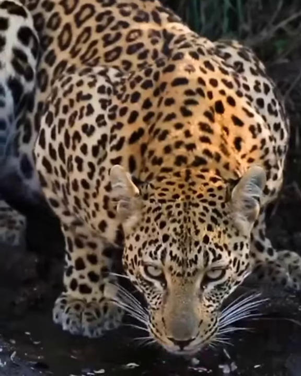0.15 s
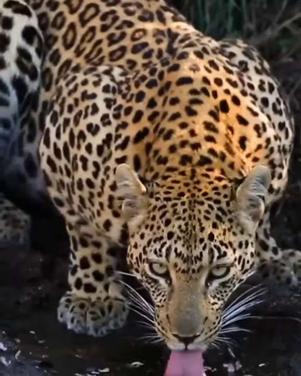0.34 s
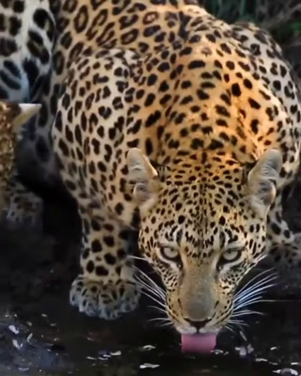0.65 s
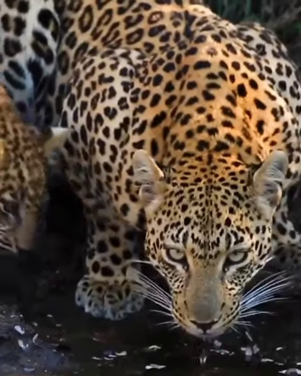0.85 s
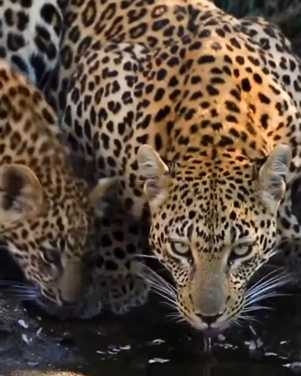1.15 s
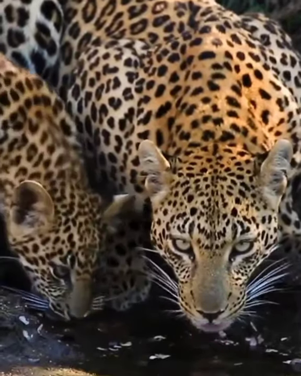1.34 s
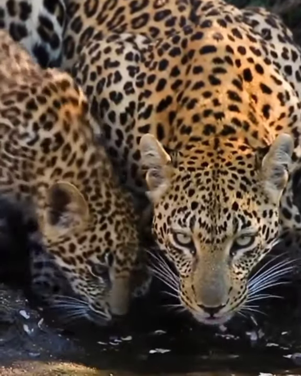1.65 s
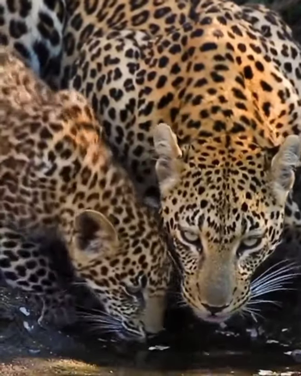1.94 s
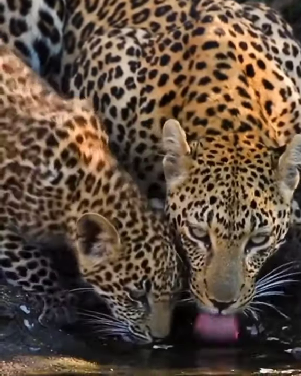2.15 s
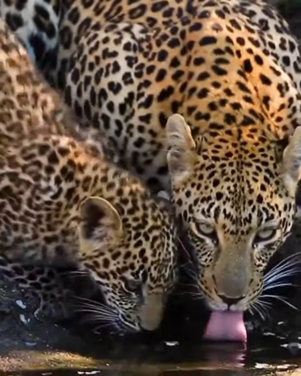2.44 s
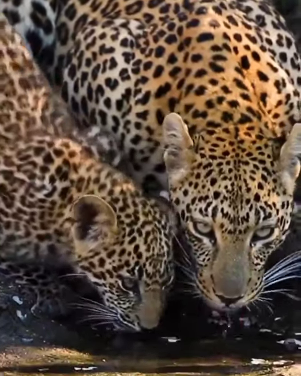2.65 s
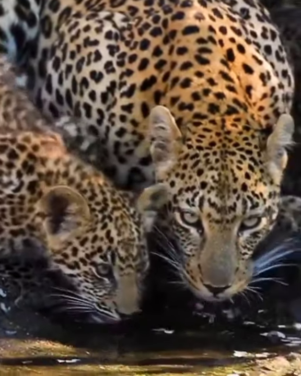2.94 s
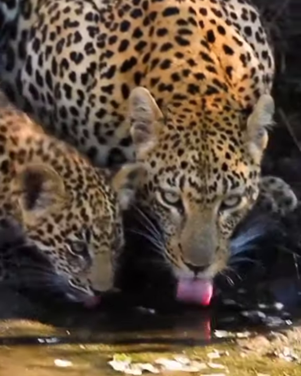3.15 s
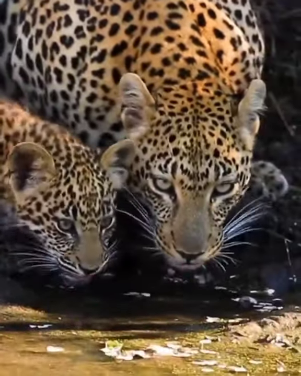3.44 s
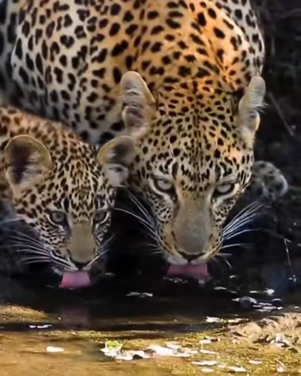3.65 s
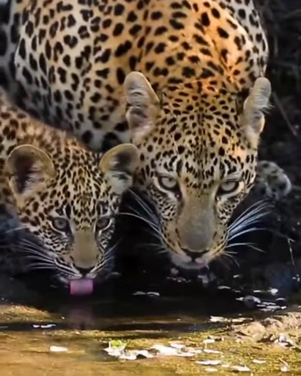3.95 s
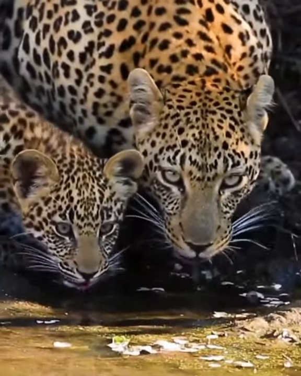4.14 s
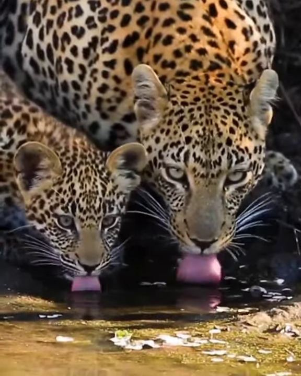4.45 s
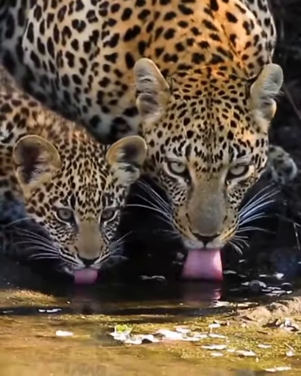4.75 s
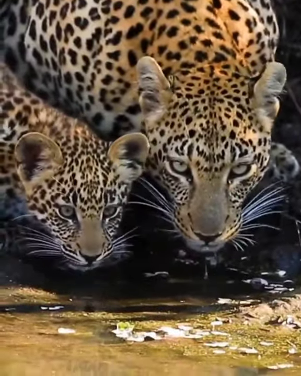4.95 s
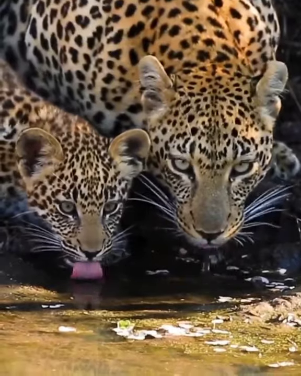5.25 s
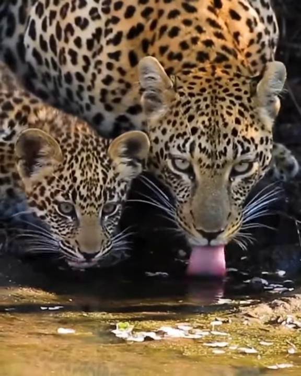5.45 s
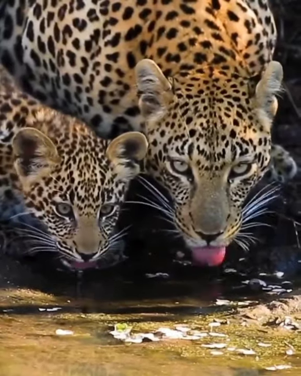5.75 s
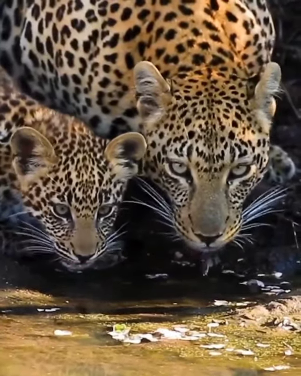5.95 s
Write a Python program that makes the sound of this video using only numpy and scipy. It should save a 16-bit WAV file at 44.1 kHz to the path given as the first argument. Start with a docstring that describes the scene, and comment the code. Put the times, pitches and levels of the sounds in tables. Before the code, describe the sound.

After a tenth of a second of silence, a faint, steady outdoor hiss begins, gently fluctuating, with tiny droplets beneath it. Two leopards lap at a pool: soft bubbly plops at 0.2 to 0.35 s, then a sharp, bright wet tick at 0.66. At 0.85 a camera very close to the microphone fires, a rapid cluster of metallic clacks and rattles in a hollow housing, lasting under a quarter second with low thuds. Sparse ticks follow from 1.35; plops return around 2.1, with a stronger one at 2.5. Lapping thickens from 2.85, and wet clicks crowd together from 3.7 to 4.2, with a firm plop at 3.9. The shutter clatters again at 4.66, followed by a tiny double knock at 4.85. Dull handling bumps land at 5.12 and 5.18, stronger than a faint one at 3.03. Small plops continue over the hiss until about 6 s.

```python
"""At the edge of an outdoor pool: a faint hiss of air lies behind two big cats lapping at the water.
Tongue plops are ringing bubbles with a slap of noise; wet ticks are short pitched cracks; droplets ring faintly.
Close to the microphone a camera fires twice: its contacts drive rattling parts, metal and a hollow housing.
A short double knock, made like the plops, is probably the camera settling; the hand-held gear is knocked too.
The two microphone ports agree in the bass and differ in the treble."""
import sys
import numpy as np
from scipy import signal
from scipy.fft import rfft, irfft
from scipy.io import wavfile

SR = 44100
rng = np.random.default_rng(int(sys.argv[2]) if len(sys.argv) > 2 else 0)


def pcm_store(signal):
    """Save signal as 16-bit PCM."""
    levels = np.round(np.clip(np.atleast_2d(signal), -1, 1) * 32767)
    wavfile.write(sys.argv[1], SR, levels.astype(np.int16).T)


N = 269010


def amp(db):
    """dB to gain."""
    return 10 ** (np.asarray(db) / 20)


def rms_one(x):
    """Scale to unit rms."""
    return x / np.sqrt(np.mean(x ** 2) + 1e-20)


def shaped(x, spectrum):
    """Colour a noise by a (frequency [Hz], level [dB]) spectrum, interpolated over log frequency."""
    hz = np.maximum(np.fft.rfftfreq(x.shape[-1], 1 / SR), 1)
    point_hz, point_db = np.array(spectrum).T
    gain = amp(np.interp(np.log(hz), np.log(point_hz), point_db))
    return irfft(rfft(x) * gain, x.shape[-1])


def butter(x, hz, kind, order=2):
    """Causal Butterworth filter."""
    return signal.sosfilt(signal.butter(order, hz, kind, fs=SR, output="sos"), x)


def drift(rate_hz):
    """Random wander below rate_hz, with unit rms; the filter settles for a second first."""
    return rms_one(butter(rng.standard_normal(N + SR), rate_hz, "low")[SR:])


def ring(drive, hz, t60):
    """A unit click sets a tone of height 1 ringing; nothing radiates far below its pitch."""
    radius = amp(-60 / (t60 * SR))
    angle = 2 * np.pi * hz / SR
    # the tiny offset keeps the decay out of very slow arithmetic
    return signal.lfilter([.5, 0, -.5], [1, -2 * radius * np.cos(angle), radius ** 2], drive + 1e-18)


def add(track, s, sound):
    """Mix a short sound in at time s."""
    at = round(s * SR)
    track[..., at:at + sound.shape[-1]] += sound[..., :N - at]


def burst(t60, rise_s):
    """Envelope that rises fast and dies away over t60, at most 150 ms long."""
    t = np.arange(round(.15 * SR)) / SR
    return (1 - np.exp(-t / rise_s)) * amp(-60 * t / np.clip(t60, .003, .3))


# Spectrum of the outdoor hiss, relative: (frequency [Hz], level [dB per Hz])
AIR_SPECTRUM = [(12, -45), (20, -24.5), (82, -9.5), (561, -2.5), (865, -6.5), (1130, -6), (2170, -10),
                (3350, -9.5), (7160, -12), (13000, -13.5)]
# Course of the hiss before gusts and flicker: (time [s], level below 3.5 kHz [dB], level above it [dB])
AIR_LEVEL = [(.4, -57, -61), (.75, -58.5, -61.5), (1.6, -59.5, -64.5), (2.3, -58.5, -63),
             (2.83, -59.5, -64.5), (3.15, -57.5, -62), (3.7, -59, -62.5), (4.1, -57.5, -61.5),
             (4.73, -58, -62.5), (6.1, -59, -63.5)]
GUST_DB = .6   # rms


def air():
    """Outdoor hiss; a shared gust swells all of it, and the low band and each treble band flicker apart."""
    s, low_db, high_db = np.transpose(AIR_LEVEL)
    t = np.arange(N) / SR
    hiss = shaped(rng.standard_normal((3, 2, N)), AIR_SPECTRUM)
    gust = GUST_DB * drift(5.9)
    edges = np.geomspace(3500, 14000, 5)
    low = rms_one(butter(hiss[-1], edges[0], "low", order=3)) * amp(0.93 * drift(25))
    # neighbouring bands get unrelated noise
    bands = [butter(hiss[k % 2], edges[k:k + 2], "band", order=3) for k in range(len(edges) - 1)]
    high = rms_one(sum(band * amp(2.0 * drift(19.4)) for band in bands))
    low_gain = amp(np.interp(t, s, low_db) + gust)
    high_gain = amp(np.interp(t, s, high_db) + gust)
    return low * low_gain + high * high_gain


SPLASHES_PER_S, SMALLEST_SPLASH_DB = 110, -67.5


def splashes():
    """Faint droplets at random, each ringing at one of 14 pitches and gone by about 16 cycles."""
    falls = rng.random(N) < SPLASHES_PER_S / SR
    sizes = amp(4.55 * np.minimum(rng.exponential(1, N), 4)) * falls
    dealt = rng.integers(0, 14, N)
    pitches = np.geomspace(450, 5000, 14)
    return amp(SMALLEST_SPLASH_DB) * sum(ring(sizes * (dealt == k), hz, 15.7 / hz)
                                         for k, hz in enumerate(pitches))


# Tongue plops, and at 4.848 s a short double knock, probably the camera settling:
# (time [s], ringing level [dB], pitch [Hz], t60 [s])
PLOPS_AND_SETTLING = [(.219, -46, 1040, 0.024), (.252, -41, 495, 0.032), (.352, -51, 616, 0.046),
                      (2.086, -50, 750, .035), (2.105, -45, 1116, 0.032), (2.356, -46.5, 1290, 0.03),
                      (2.4862, -30, 980, 0.0083), (2.492, -44, 1400, .017), (2.846, -45.5, 227, 0.032),
                      (2.856, -49.5, 2700, .04), (2.919, -45, 1253, 0.043), (2.968, -51.5, 376, 0.057),
                      (3.007, -42, 594, 0.014), (3.111, -51, 1990, .025), (3.139, -47, 1200, 0.05),
                      (3.184, -45, 1400, 0.025), (3.272, -48, 1186, 0.033), (3.361, -46, 1460, .03),
                      (3.512, -55, 750, 0.056), (3.614, -45.5, 480, 0.026), (3.639, -44, 1250, .03),
                      (3.8986, -32.5, 434, .012), (4.034, -48.5, 1080, 0.069), (4.343, -46, 2530, 0.016),
                      (4.4787, -37, 1790, 0.03), (4.8478, -43, 2070, 0.026), (4.8488, -44, 700, 0.014),
                      (5.068, -50, 956, 0.031), (5.222, -48, 796, .043), (5.455, -51, 1170, .03),
                      (5.49, -48, 1460, 0.041), (5.607, -49, 953, 0.073), (5.73, -41.5, 1210, 0.021),
                      (5.8127, -47.5, 3830, .023), (5.88, -51, 1250, .04)]
SLAP_DB, SLAP_T60_S = -7, 0.019   # level relative to the ringing
WOBBLE_RAD = 0.46   # rms phase waver of the ringing


def plops_and_settling():
    """A decaying tone with a wider noise slap: a plop's bubble and wet slap, or the settling double knock."""
    out = np.zeros(N)
    for s, db, hz, t60 in PLOPS_AND_SETTLING:
        envelope = burst(t60, rise_s=0.00032)
        t = np.arange(len(envelope)) / SR
        slap_noise = rms_one(butter(rng.standard_normal(len(t)), [hz / 1.6, hz * 1.87], "band"))
        slap = slap_noise * burst(SLAP_T60_S, rise_s=0.00013)
        waver = WOBBLE_RAD * rms_one(butter(rng.standard_normal(len(t)), 120, "low"))
        ringing = envelope * np.sin(2 * np.pi * hz * t + waver)
        add(out, s, amp(db) * butter(amp(SLAP_DB) * slap - ringing, hz / 7, "high"))
    return out


# Bright wet ticks: (time [s], level [dB], pitch [Hz])
TICKS = [(.3848, -50, 7950), (.633, -48, 4880), (0.6567, -21, 6000), (1.3555, -38, 5630),
         (1.558, -47, 5430), (1.567, -46, 5490), (1.956, -52, 8500), (2.1061, -43.5, 3930),
         (3.0136, -43.5, 10700), (3.6163, -46, 3870), (3.715, -47, 7800), (3.7657, -45, 6010),
         (3.7882, -42.5, 8800), (3.791, -52, 8890), (3.8222, -46, 7780), (3.857, -40.5, 6600),
         (3.8937, -40, 6000), (3.8995, -35.5, 5400), (3.9507, -45.5, 5840), (3.9725, -50, 7000),
         (3.986, -48.5, 8500), (3.991, -43, 5500), (4.0312, -34.5, 5600), (4.041, -53, 6500),
         (4.111, -46, 6490), (4.1198, -43, 6100), (4.195, -51, 7000), (4.607, -49, 3850),
         (5.181, -43, 3660), (5.456, -53, 3800)]
BODY_T60_S, TAIL_T60_S = 0.022 * 0.38, 0.022 * 2.3   # for a tick at -42.5 dB
TICK_SHORTENS = 0.15   # dB of length lost per dB of level
TICK_EDGE = 3.2   # first impulse relative to the noise


def ticks():
    """A sharp crack around its own pitch, the harder the shorter, with a weaker tail."""
    out = np.zeros((2, N))
    for s, db, hz in TICKS:
        stretch = amp(-TICK_SHORTENS * (db + 42.5))
        body = burst(BODY_T60_S * stretch, rise_s=0.00014)
        envelope = body + 0.17 * burst(TAIL_T60_S * stretch, rise_s=0.00027)
        snap = rng.standard_normal((2, len(envelope)))
        tone = rms_one(butter(snap, [hz / 1.12, min(hz * 1.28, 16000)], "band"))
        fizz = 0.77 * butter(snap, 5300, "high", order=4)
        click = signal.unit_impulse(len(envelope))
        edge = butter(click, [hz / 1.1, min(hz * 1.55, 18000)], "band")
        add(out, s, amp(db) * (envelope * (tone + fizz) + TICK_EDGE * edge))
    return out


# Dull knocks on the hand-held gear: (time [s], blow level [dB])
KNOCKS = [(3.03, -52), (5.124, -42.5), (5.1803, -40)]
# Modes of the gear: (frequency [Hz], level [dB], t60 [s])
GEAR_MODES = [(275, -14, 0.03), (374, 5.5, 0.025), (700, -5, 0.019), (1115, -9, 0.03)]
# The heavy frame, answering late: (frequency [Hz], level [dB], t60 [s], delay [s])
GEAR_BOOM = (199, -1, 0.07, .007)


def knocks():
    """One blow strikes every mode of the gear; the heavy frame is pushed softly a moment later."""
    blows, late = np.zeros(N), np.zeros(N)
    boom_hz, boom_db, boom_t60, delay_s = GEAR_BOOM
    for s, db in KNOCKS:
        blows[round(s * SR)] = -amp(db)
        late[round((s + delay_s) * SR)] = amp(db + boom_db)
    boom = ring(butter(late, 290, "low"), boom_hz, boom_t60)
    soft_blows = butter(blows, 2400, "low")
    return boom + sum(amp(db) * ring(soft_blows, hz, t60) for hz, db, t60 in GEAR_MODES)


# The camera fires: (time [s], level [dB], level added to the winding-down contacts [dB])
RELEASES = [(0.8525, -0.5, 3.5), (4.6623, -0.17, -3.5)]
# Contacts of one firing, before its own level: latch, mirror at its stop, mirror bounces, blades start,
# two blade sets land, recocking, winding down.
# (time after release [s], rattle level [dB], heavy parts above it [dB], fine parts above it [dB],
#  housing drive [dB], rattle t60 [s])
CYCLE = [(0, -35, 2, -10, -85, 0.028), (.0115, -24.5, -8, -4, -65.5, .026), (.016, -37.5, -2, -9, -58, 0.1),
         (0.021, -38, -5.5, -4, -63, 0.095), (0.032, -39, 7, -4, -60, 0.046),
         (0.041, -44.5, -3, -2, -70, 0.025), (.058, -54, 0, 9, -53.5, .09), (.063, -21, -10, -2, -59, .024),
         (0.0713, -20.5, -24.5, 9, -53, 0.017), (0.0774, -29.5, 0.5, -6, -77, 0.056),
         (.083, -38, 6, 6, -85, 0.033), (.0883, -34.5, 4.5, 7.5, -66, .042),
         (0.09, -35, 5.5, -2, -73, 0.042), (0.096, -29, -2, 8, -53.5, .04),
         (0.1095, -39, 9, 3, -65.5, 0.03), (.120, -50, 15.5, -5, -60, 0.089),
         (0.13, -57, 1.5, 4, -73, 0.16)]
# Stray clatter of the same parts after the first firing: (time [s], then as in CYCLE)
CLATTER = [(1.023, -48, -4, 7, -60.5, 0.054), (1.0272, -38, 14.5, -5, -70, 0.015),
           (1.042, -53.5, 9, -1, -67.5, 0.079)]
WINDING_DOWN_S = .112   # after release


def contacts():
    """Every firing plays the same cycle of contacts at its own strength; stray clatter is added."""
    fired = []
    for start, level_db, winding_db in RELEASES:
        for s, db, heavy_db, fine_db, housing_db, t60 in CYCLE:
            gain_db = level_db + winding_db * (s > WINDING_DOWN_S)
            fired.append((start + s, db + gain_db, heavy_db, fine_db, housing_db + gain_db, t60))
    return fired + CLATTER


# Spectrum of the loose parts, relative: (frequency [Hz], level [dB per Hz])
RATTLE_SPECTRUM = [(760, -24), (1300, -4.5), (1740, -6.5), (2710, -3), (3310, -7.5), (3940, -5), (4700, 2),
                   (5600, 2.5), (6600, -6.5), (9620, -2.5), (13000, -15), (15500, -28)]
# Ringing metal parts: (frequency [Hz], level before METAL_DB [dB], t60 [s])
METAL_MODES = [(2608, -5, 0.04), (3460, -5, 0.05), (4900, -9, 0.02), (5400, -6, 0.02), (6040, 3, 0.025),
               (6590, 3, 0.02), (7400, -10, 0.03), (9500, -20, .03), (10300, -20.5, 0.04)]
METAL_DB = -31.5   # how strongly the rattle drives the metal parts
HEAVY_BELOW_HZ, FINE_ABOVE_HZ = 2920, 7050


def rattle_and_metal():
    """Each contact shakes loose parts of three sizes; their rattle sets metal of like pitch ringing."""
    rattle = np.zeros((3, 1, N))   # envelopes of the heavy, middle and fine parts
    for s, db, heavy_db, fine_db, _, t60 in contacts():
        levels = amp(db + np.array([heavy_db, 0, fine_db]))
        add(rattle, s, levels[:, None, None] * burst(t60, rise_s=0.00068))
    uneven = amp(1.2 * drift(640))   # the parts knock together in tiny clumps
    grit = rms_one(shaped(rng.standard_normal((2, N)), RATTLE_SPECTRUM)) * uneven
    sizes = [butter(grit, HEAVY_BELOW_HZ, "low", order=4),
             butter(grit, [HEAVY_BELOW_HZ, FINE_ABOVE_HZ], "band", order=3),
             butter(grit, FINE_ABOVE_HZ, "high", order=4)]
    shake = uneven * rng.standard_normal((2, N))
    size_of = np.searchsorted([HEAVY_BELOW_HZ, FINE_ABOVE_HZ], np.array(METAL_MODES)[:, 0])
    metal = sum(amp(db + METAL_DB) * ring(rattle[k] * shake, hz, t60)
                for k, (hz, db, t60) in zip(size_of, METAL_MODES))
    return (rattle * sizes).sum(axis=0) + metal


# Modes of the hollow housing: (frequency [Hz], level [dB], t60 [s])
HOUSING_MODES = [(348, -15, 0.015), (484, -12.5, 0.068), (573, -7.5, 0.022), (679, -6, 0.081),
                 (700, -4, 0.047), (755, -3, 0.05), (920, -1, 0.022), (1029, -7.5, 0.051),
                 (1140, -3.5, 0.032), (1400, -9.5, 0.0077)]


def housing():
    """Each contact pushes the hollow housing with a burst of noise, and its modes boom."""
    push = np.zeros(N)
    for s, _, _, _, housing_db, _ in contacts():
        add(push, s, amp(housing_db) * burst(0.053, rise_s=0.0017))
    return sum(amp(db) * ring(push * rng.standard_normal(N), hz, t60) for hz, db, t60 in HOUSING_MODES)


# The mirror lands in the camera: (time [s], blow level before the low-pass [dB])
THUDS = [(.968, -39.5), (1.025, -42), (1.045, -43), (4.74, -46.5)]
THUD_HZ, THUD_T60_S = 270, 0.065


def mirror_thuds():
    """Softened blows set one low mode of the camera ringing."""
    blows = np.zeros(N)
    for s, db in THUDS:
        blows[round(s * SR)] = amp(db)
    return ring(butter(blows, 630, "low"), THUD_HZ, THUD_T60_S)


def shutter():
    """The camera up close: rattle and ringing metal, booming housing and landing mirror."""
    return rattle_and_metal() + housing() + mirror_thuds()


PORTS_PART_HZ = 4820
NEAR_SIDE_DB, AIR_SIDE_DB = -17, -4.5   # treble difference between the ports
BASS_SIDE_DB = -49   # full-band difference, relative to the treble one


def ports(mid_side, side_db):
    """Left and right microphone ports: only the treble differs much between them."""
    mid, side = mid_side
    treble = butter(side, PORTS_PART_HZ, "high", order=14)
    side = amp(side_db) * (treble + amp(BASS_SIDE_DB) * side)
    return np.array([mid + side, mid - side])


def scene():
    """Air and droplets behind, lapping at the pool, camera and gear at the microphone."""
    background = ports(air(), AIR_SIDE_DB) + splashes()
    ticks_and_camera = ports(ticks() + shutter(), NEAR_SIDE_DB)
    return background + plops_and_settling() + knocks() + ticks_and_camera


START_S, CUTOFF_HZ = .112, 13080


def record(dry):
    """Sound starts after a short silence; a steep low-pass cuts the top."""
    running = dry * np.clip((np.arange(N) / SR - START_S) / .002, 0, 1)
    return signal.sosfilt(signal.ellip(12, .5, 55, CUTOFF_HZ, fs=SR, output="sos"), running)


dry = scene()
out = record(dry)
pcm_store(out)
```